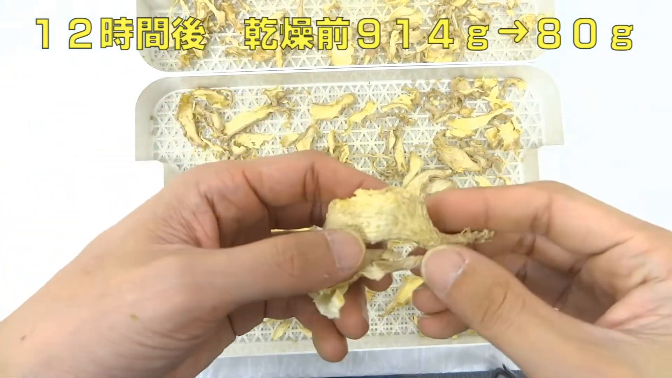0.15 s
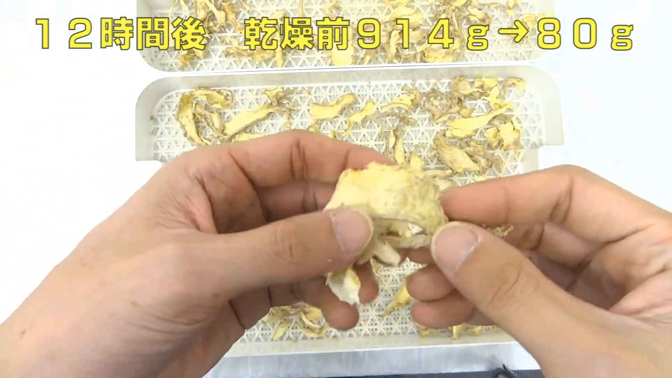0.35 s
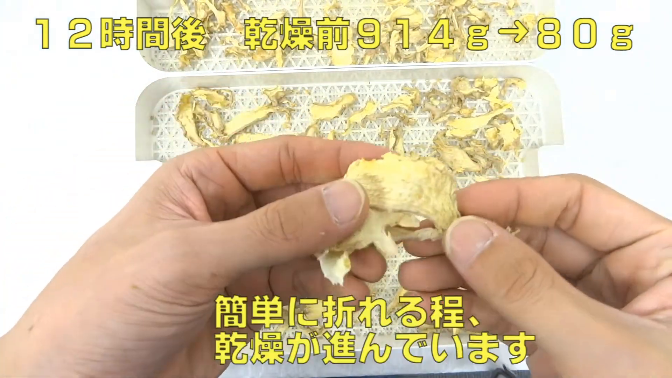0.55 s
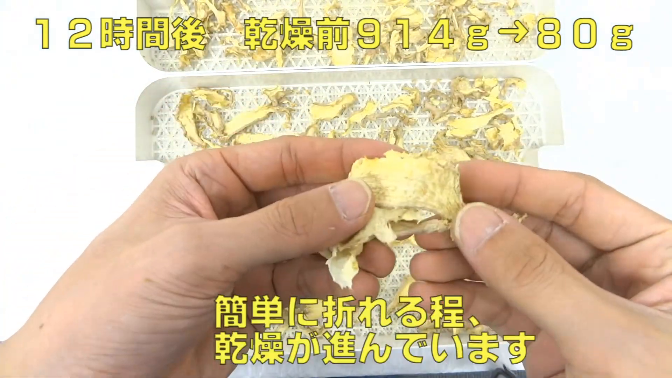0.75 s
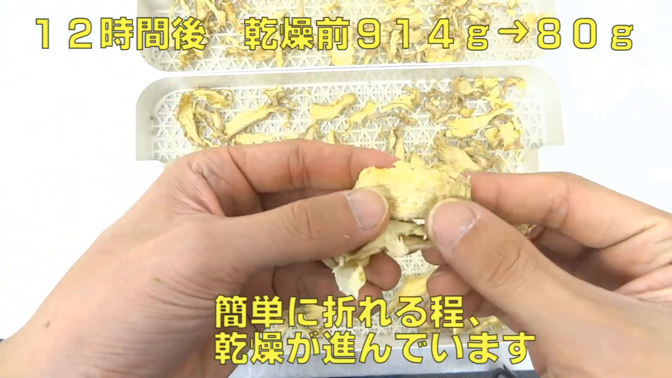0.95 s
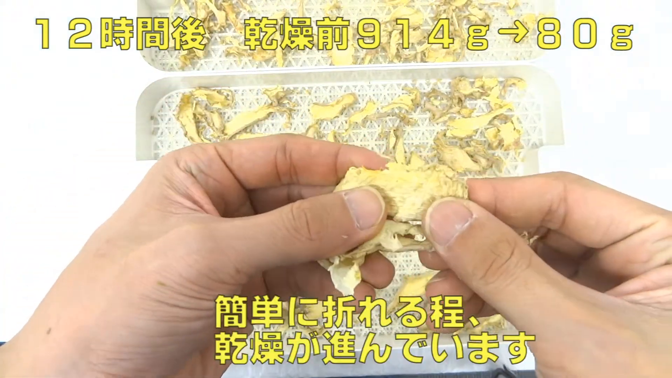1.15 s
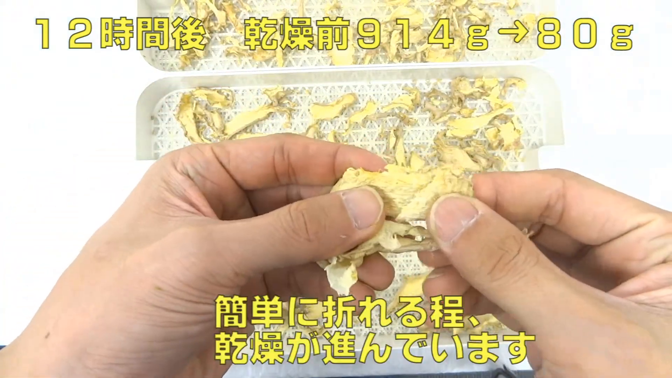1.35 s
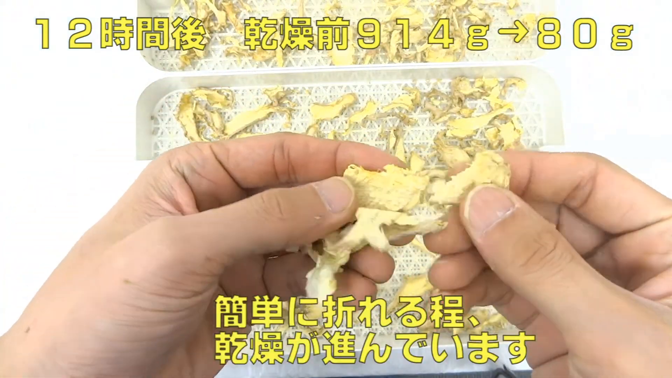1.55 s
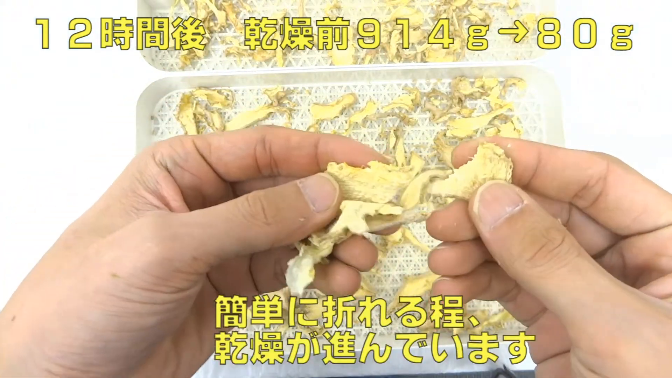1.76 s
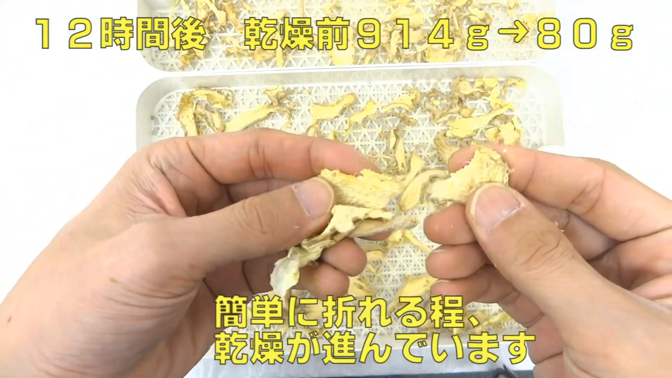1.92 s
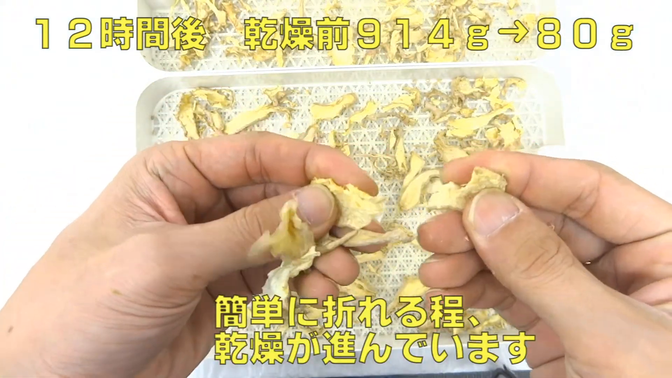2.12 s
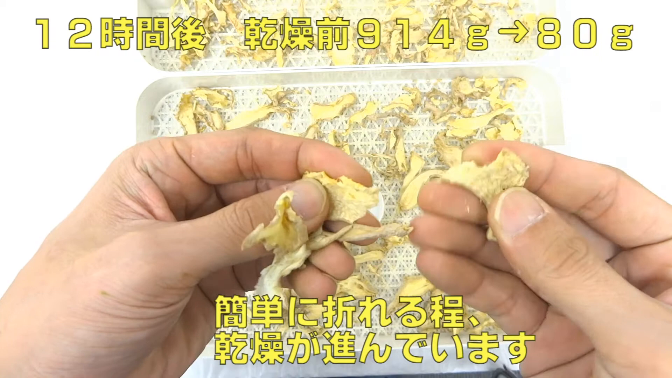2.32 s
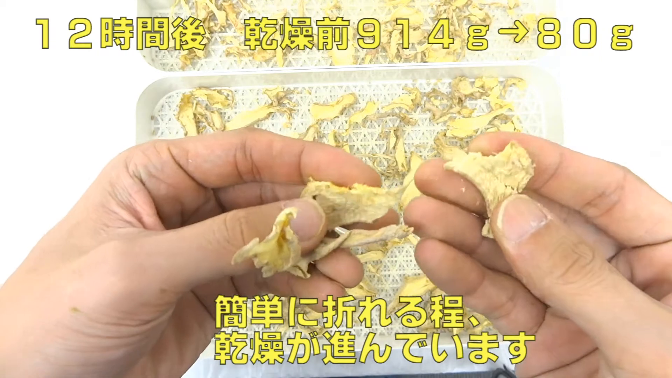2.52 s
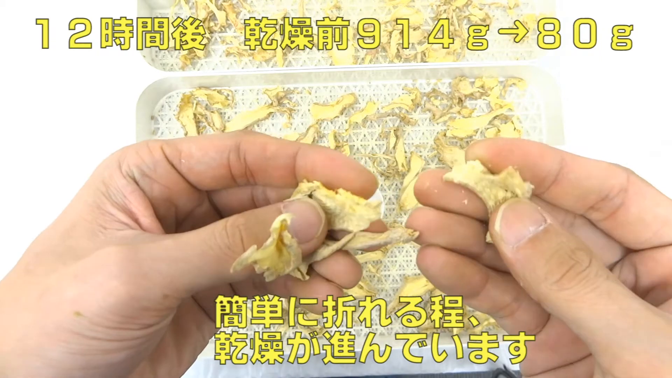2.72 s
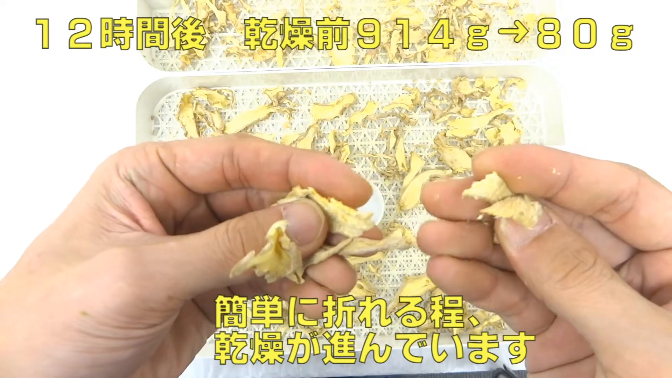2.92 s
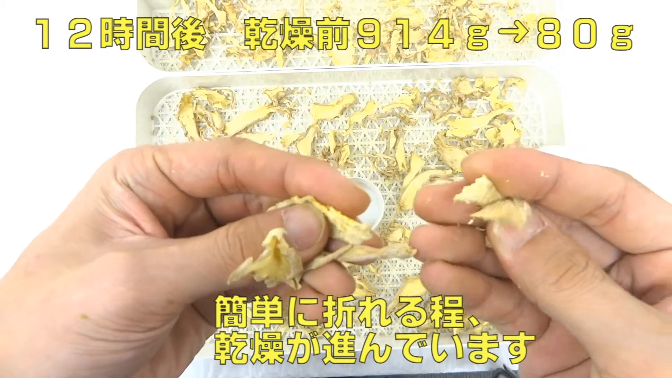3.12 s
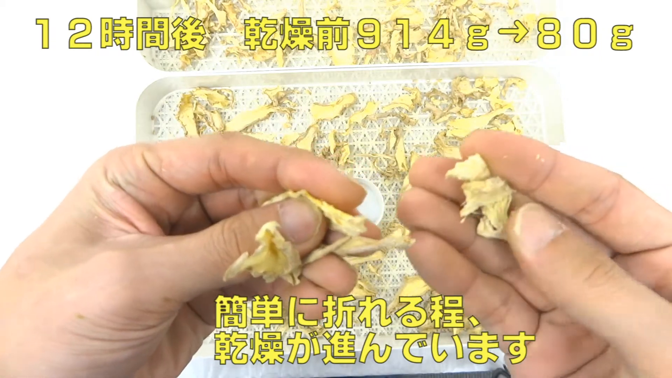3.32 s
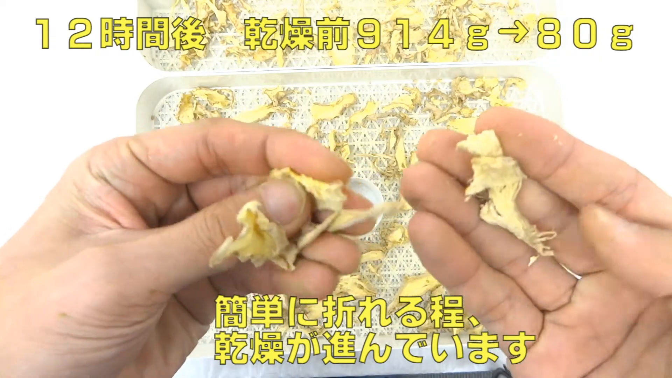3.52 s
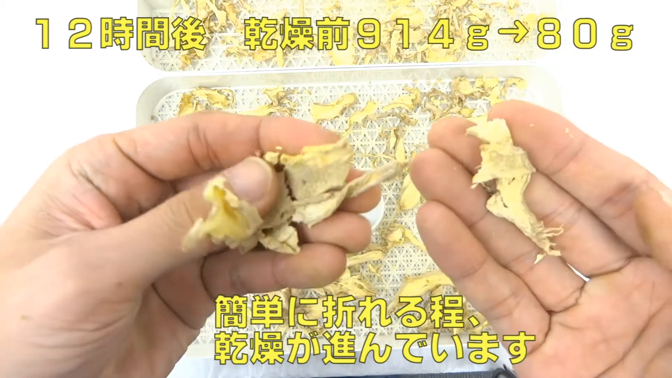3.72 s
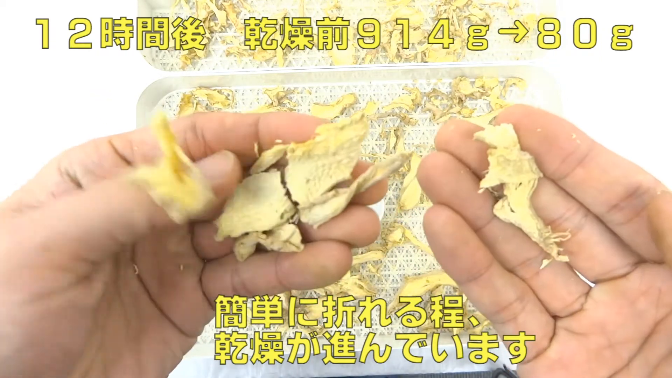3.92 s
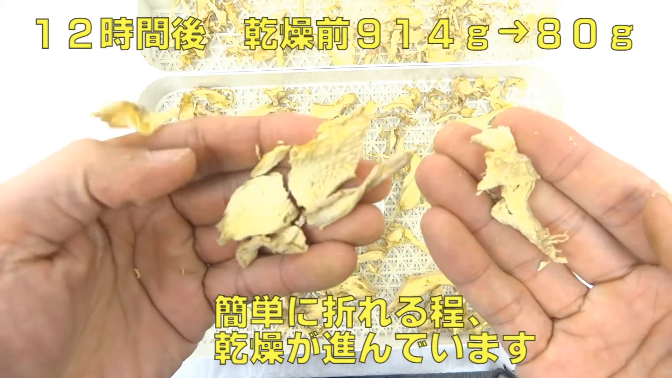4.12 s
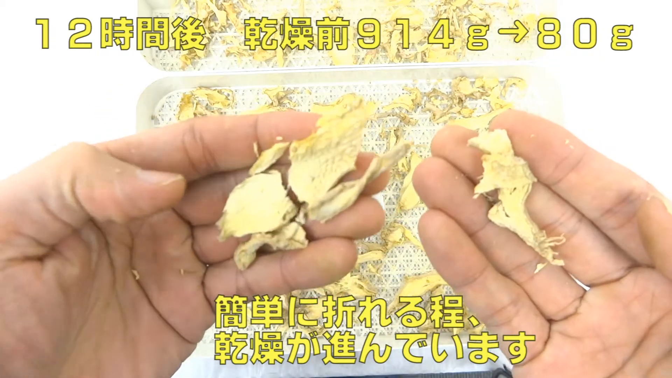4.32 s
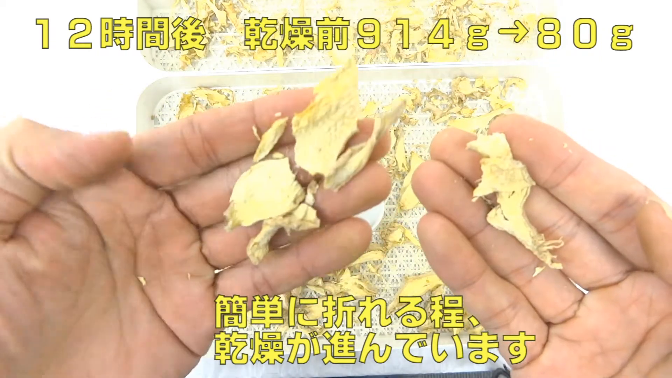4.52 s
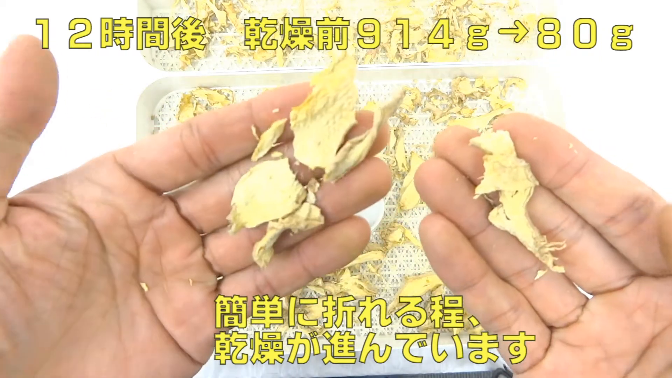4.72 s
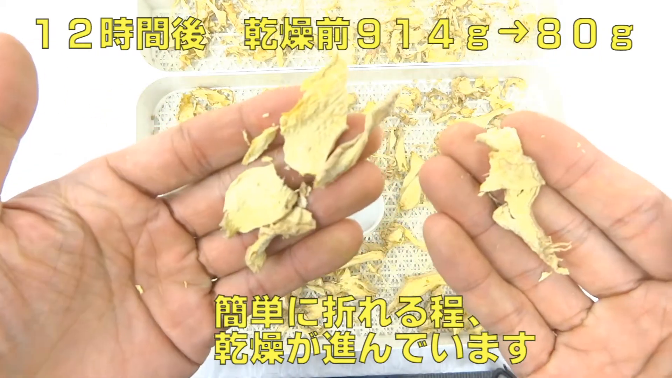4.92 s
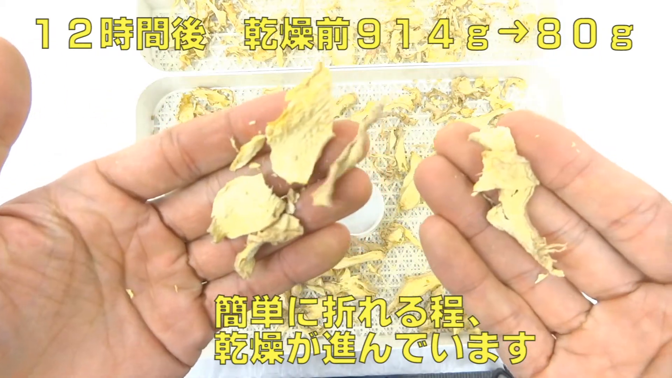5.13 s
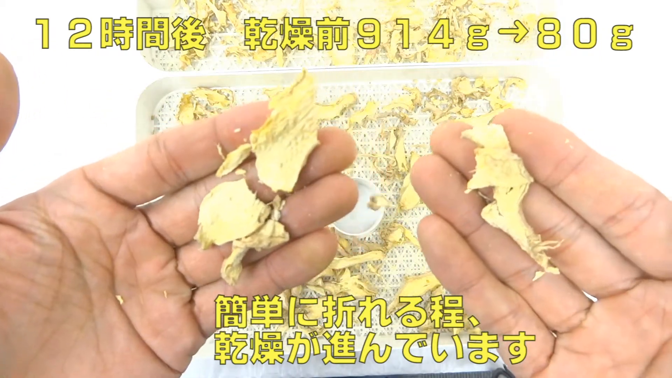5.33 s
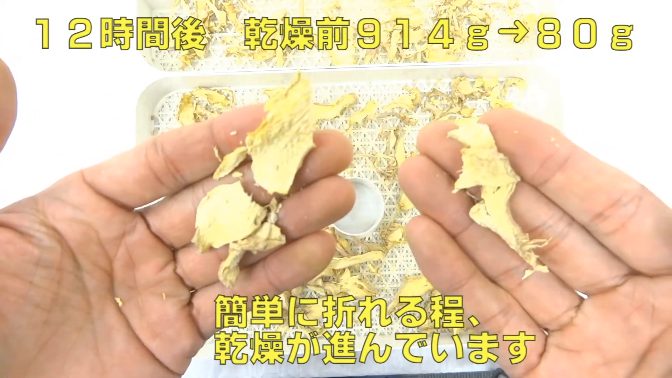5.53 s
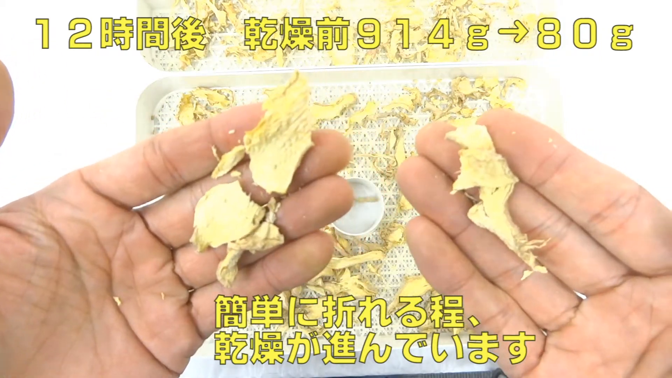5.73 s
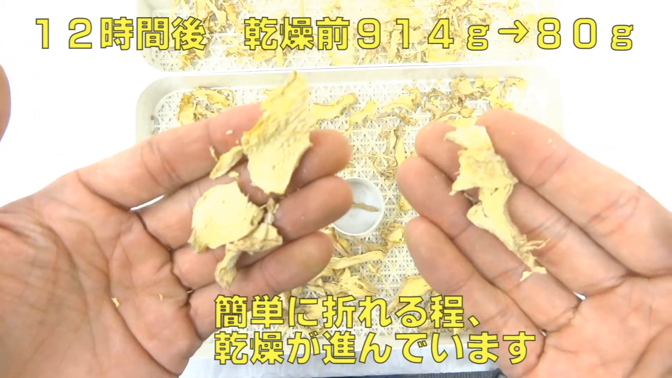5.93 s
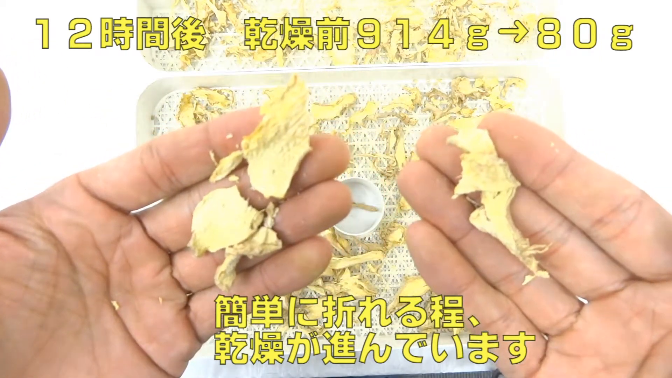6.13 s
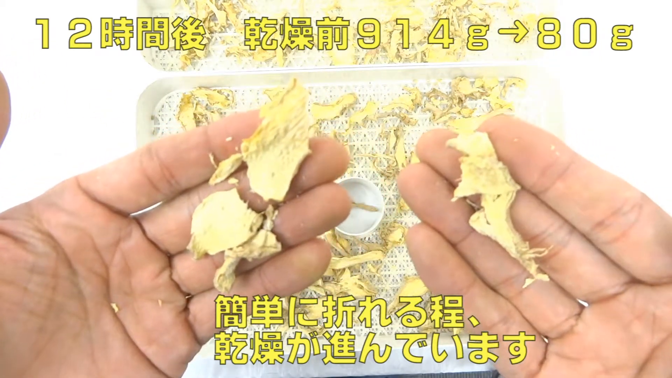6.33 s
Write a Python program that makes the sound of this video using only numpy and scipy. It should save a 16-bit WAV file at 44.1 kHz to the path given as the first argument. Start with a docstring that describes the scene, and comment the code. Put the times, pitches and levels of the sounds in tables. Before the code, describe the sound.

Close stereo sound in a small hard room, with a faint, steady low fan hum throughout. From 0 to 1 second, dry brittle slices crackle between fingers: rapid, crisp, high clicks over fine gritty crumbling. A dense, louder burst of snaps comes at about 1.1-1.2 seconds, then sparser ticks and faint thin scrapes until 1.7. Another sharp cluster runs from 1.8 to 2.1, with small woody rings, then lighter, duller ticks. The strongest single crack hits at 2.8, followed by bright snaps at 3.2 and 3.4 and lesser ones to 3.7, including a tiny falling squeak near 3.6. From 4 to 4.6 only weak, soft crackles remain. Soft hiss swells briefly around 5. At 5.53 a dropped piece clacks on a hollow plastic tray, rattling in quick bounces until 5.6, with a faint tap at 5.85. Quiet hum and faint hiss end it near 6.4.

```python
"""Fingers snap and crumble dry, brittle slices of root close to a stereo microphone, above a plastic tray.
Each crack is a click, mostly of a millisecond or two: shaped noise coloured by splinter and slice, over a thud.
Sparse grains make the crumbling; short modes colour the cracks; thin noise bands scrape, small tones squeak.
One piece bounces on the tray. Hands, tray and a small hard room throw the sounds back as taps and noisy tails.
A fan hums somewhere in the room, made of noise through resonances, under a soft hiss that swells and fades."""
import sys
import numpy as np
from scipy import signal
from scipy.fft import rfft, irfft
from scipy.io import wavfile
from scipy.ndimage import uniform_filter1d

SR = 44100
rng = np.random.default_rng(int(sys.argv[2]) if len(sys.argv) > 2 else 0)


def wav_record(signal):
    """Record a signal, one row per channel, as 16-bit PCM in the file named by sys.argv[1]."""
    frames = np.transpose(np.atleast_2d(signal))
    bounded = np.clip(frames, -1, 1)
    # unit amplitude maps onto the largest positive 16-bit level
    quanta = np.round(bounded * 32767).astype(np.int16)
    wavfile.write(sys.argv[1], SR, quanta)


N = 284886


def gain_of(db):
    """Decibels to gain."""
    return 10 ** (np.asarray(db) / 20)


def evened(x):
    """Scaled to rms 1."""
    return x / np.sqrt(np.mean(x ** 2) + 1e-20)


def read(points, hz):
    """Curve of (Hz, value) points, interpolated on a log-frequency axis."""
    point_hz, value = np.transpose(points)
    return np.interp(np.log(hz + 1), np.log(point_hz + 1), value)


def peaked(modes, hz):
    """Gain of steep resonant peaks standing on a flat response."""
    power = 1
    for mode_hz, width_hz, db in modes:
        power = power + (gain_of(db) ** 2 - 1) / (1 + (2 * (hz - mode_hz) / width_hz) ** 2) ** 2
    return np.sqrt(power)


def causal(gain):
    """Minimum-phase impulse response: starts sharply and has the given gain at each frequency."""
    log_gain = np.log(gain + 1e-4 * gain.max())
    circle = np.concatenate([log_gain, log_gain[-2:0:-1]])
    return np.fft.ifft(np.exp(np.conj(signal.hilbert(circle)))).real


def add(mix, start_s, sound):
    """Mixes a sound in at start_s."""
    part = mix[round(start_s * SR):][:len(sound)]
    part += sound[:len(part)]


def burst(noise, length_ms):
    """Noise that swells and dies within moments, its spectrum evened so that only the struck body colours it."""
    u = np.arange(len(noise)) * 3100 / SR / max(length_ms, .15)
    shape = u ** 2 * np.exp(-1.5 * u)
    z = rfft(noise * shape)
    white = irfft(z / (abs(z) + 1e-9), len(noise))
    return np.sqrt(shape) * white


# clear cracks: start_s, tear_peak_db, centre_hz, thud_db (re tear), length_ms, room_db (send past the hands)
CRACKS = [(.129, -25.5, 10200, -23, 6.9, -4), (0.1412, -25, 10000, -19, 2.7, 5.5),
          (0.2556, -20.5, 10500, -17, 0.91, 5.5), (0.2663, -26, 9500, -21, 0.83, -1),
          (.275, -24, 8400, -15, 1.1, 8.5), (0.2859, -17.5, 9700, -25, 0.74, 4.5),
          (0.308, -23, 9000, -24, 2.3, -11), (0.3199, -18.5, 6500, -27, 0.97, -13),
          (.3323, -22, 9400, -21, 1., -14), (.3557, -31, 5600, -15, 1.2, -1),
          (.388, -30, 9300, -40, 1.2, 1), (0.4009, -19.5, 9400, -35, 2.3, 3.5),
          (0.4316, -20, 8100, -15.5, 2.6, -3), (.4507, -24, 8900, -15, 1, -16),
          (.463, -21.5, 9100, -16, 0.8, -19), (0.5269, -27, 7740, -11, 2.3, -4),
          (0.5723, -26, 8500, -16, 1.4, -4), (0.599, -27.5, 8100, -9, 0.36, 9.5),
          (0.666, -22.5, 9800, -13.5, 3.9, -16), (.734, -27, 9500, -20, 2, -6),
          (.7385, -17, 9500, -22, 2.4, -8), (.7512, -31, 6250, -39, 2.1, -15),
          (0.783, -30, 5650, -11, 0.79, -19), (0.8163, -33, 9900, -9, 3.5, 4.5),
          (.83, -27, 10000, -15, 1, -8), (.897, -27.5, 9700, -20, 1, -3),
          (.917, -27.5, 10000, -43, 1.5, 4.5), (0.936, -32, 8900, -1.5, 1.7, 2),
          (0.9496, -24, 10700, -13, 1.8, 1.5), (1.041, -29, 10100, -19, 1.6, 0),
          (1.079, -31, 8040, -13, 1.4, -25), (1.098, -25, 10000, -31, 1, -16),
          (1.1084, -13.5, 7200, -20, 1.3, -36), (1.1316, -13, 7700, -17.5, 0.42, -7),
          (1.14, -18, 9250, -28, 1.8, -7), (1.1483, -13, 8700, -29, 0.94, 0.5),
          (1.1525, -8, 10000, -45, 0.87, -21), (1.164, -15.5, 9700, -32, 1.9, -4),
          (1.168, -19, 5500, -18, 1.5, -4), (1.1794, -9.5, 9600, -27, 0.39, -8.5),
          (1.241, -26, 8300, -15, 1.2, -10), (1.2573, -18.5, 9000, -13, 1.02, -13),
          (1.3684, -20.5, 10900, -14, 0.47, -9), (1.4071, -33, 9000, -6.5, 1.07, 8),
          (1.462, -27, 9900, -13, 4, -1), (1.5685, -19, 9900, -12, 0.73, -3),
          (1.639, -31.5, 9130, -33, 1.9, -15.5), (1.7311, -29, 10200, -20, 1.7, -3),
          (1.747, -34, 8450, -18, 0.97, -7), (1.771, -21.5, 8700, -21, 0.85, -6),
          (1.811, -24, 10200, -23, 2.1, -5), (1.8246, -13, 9400, -12, 0.82, -10),
          (1.828, -14, 9800, -39, 1.4, -19), (1.8446, -19, 9200, -31, 1, -17),
          (1.868, -25, 9500, -15, 2, -24), (1.9165, -16, 10000, -15, 2.2, -6),
          (1.929, -13.5, 9300, -35, 1.9, -16), (1.9436, -11.5, 10300, -35, 1.6, -14),
          (1.958, -25, 9500, -23, 1.8, -8), (1.971, -10.5, 10850, -45, 0.5, 6),
          (1.9767, -8.5, 11100, -25.5, 0.22, -3.5), (1.9808, -10.5, 9000, -16.5, 1.6, -5.5),
          (2.049, -31.5, 7800, -6, 1.9, -11), (2.0847, -20, 8370, -23, 2.2, -11),
          (2.0938, -15.5, 6900, -25, 3.5, -5), (2.1044, -12, 8240, -22, 1.6, -3),
          (2.177, -17, 8300, -25, 0.45, -18), (2.2127, -40, 5400, -7, 1, 8),
          (2.274, -35.5, 6200, -5.5, 1.6, -4), (2.3933, -30.5, 8980, -8.5, 1.5, 0),
          (2.472, -25, 7170, -37, 0.41, -8.5), (2.5122, -31, 7380, -5.5, 2.6, -18),
          (2.5206, -29.5, 7250, 1.5, 2.2, -5), (2.5337, -29, 9100, -21, 1.7, -2.5),
          (2.6385, -30.5, 9730, -28.5, 1.6, -4.5), (2.794, -21, 8700, -24.5, 0.5, -1.5),
          (2.8177, -4, 10000, -18.5, 0.81, -6), (2.86, -16.5, 9200, -33.5, 0.85, 0.5),
          (2.9322, -25.5, 8700, -22, 0.41, -4), (2.9626, -16.5, 8900, -40, 0.61, -11.5),
          (2.975, -26, 9300, -30.5, 0.56, -1), (2.997, -26.5, 8860, -28, 1.04, -18),
          (3.0253, -24.5, 9100, -31, 0.49, -7), (3.0373, -18.5, 7600, -30, 0.77, -12),
          (3.051, -38.5, 8100, -0.5, 1.5, 2), (3.091, -30.5, 9100, -30.5, 0.97, -8),
          (3.122, -23.5, 5300, -33, 0.78, -9), (3.2403, -9, 7160, -37.5, 1.14, -3),
          (3.284, -32, 5750, -37, 1, -6), (3.3205, -24.5, 10100, -27, 1.3, -10),
          (3.343, -24, 8680, -33, 0.81, -13), (3.352, -28.5, 9550, -38, 3.7, -7),
          (3.3674, -7.5, 8750, -35, 0.39, -9), (3.376, -20, 9100, -40, 1.9, 3.5),
          (3.3885, -18, 9300, -50, 1.8, 1), (3.470, -14, 7840, -43, 3.4, -3),
          (3.562, -24.5, 8500, -38, 8.8, -6), (3.5673, -25, 8700, -39, 2.4, -7),
          (3.6452, -22, 9900, -21, 3.5, 1), (3.6726, -31.5, 8000, -21, 6, -15),
          (4.045, -36, 8200, -4.5, 7.3, -9), (4.071, -34.5, 7500, -6, 5.7, -10),
          (4.1266, -42, 7400, -15, 4.9, -9), (4.305, -44, 8500, -14, 2.8, -6),
          (4.382, -33.5, 8400, -28, 1.4, -9), (4.461, -28, 9250, -10, 8.2, -9),
          (4.4717, -23, 9400, -5.5, 1.04, -2.5), (4.5262, -36.5, 9500, -18, 5.5, -8),
          (4.57, -37.5, 7900, -15, 1.3, 0.5)]
# rings of a dry slice: mode_hz, width_hz, peak_db
SLICE_MODES = [(4650, 810, 4.5), (6500, 1100, -0.5), (8700, 470, -3.5), (10370, 2500, 5)]
SPREAD_AT_11300HZ_HZ, SPREAD_PER_OCTAVE_HZ = 3640, 1700  # lower cracks are wider in colour
UNEVEN_DB = 3  # rms of each crack's own bumps in colour


def cracks():
    """Each crack is a short tear of fibres, coloured by the splinter's size and the slice's rings, over a low thud."""
    near, far = np.zeros((2, N))
    hz = np.fft.rfftfreq(1024, 1 / SR)
    thud = 1 / (1 + (hz / 4400) ** 4) / (1 + (1200 / (hz + 1)) ** 3)
    slice_gain = peaked(SLICE_MODES, hz) / (1 + (4150 / (hz + 1)) ** 15)
    bumps = rng.standard_normal((len(CRACKS), len(hz)))
    bumps = evened(uniform_filter1d(uniform_filter1d(bumps, size=12), size=12))
    fibre_noise = rng.standard_normal((len(CRACKS), 600))
    for row, fibres, bump in zip(CRACKS, fibre_noise, bumps):
        start_s, peak_db, centre_hz, thud_db, length_ms, room_db = row
        spread_hz = SPREAD_AT_11300HZ_HZ + SPREAD_PER_OCTAVE_HZ * np.log2(11300.0 / centre_hz)
        uneven = gain_of(UNEVEN_DB * bump)
        colour = np.exp(-((hz - centre_hz) / spread_hz) ** 2) * slice_gain * uneven
        force = burst(fibres, length_ms)
        tear = np.convolve(causal(colour)[:512], force)
        push = np.convolve(causal(thud * uneven)[:512], force)
        snap = tear / abs(tear).max() + gain_of(thud_db) * push / abs(push).max()
        snap = gain_of(peak_db) * snap
        add(near, start_s, snap)
        add(far, start_s, gain_of(room_db) * snap)
    return near, far


# short rings that colour the cracks: start_s, pitch_hz, peak_db, room_db (send)
RINGS = [(.274, 6760, -30, -15), (.3095, 5100, -22, -16), (0.3106, 9860, -18, -3.5), (0.317, 5020, -28, -3),
         (.3185, 6400, -23, -7), (0.318, 3000, -34, -9), (.356, 5060, -29, -13), (.432, 6550, -23.5, -18),
         (.527, 3800, -35, -10), (.611, 6800, -32, -5), (.651, 4700, -34, -8), (.739, 4300, -28, -10),
         (.753, 5840, -26, -8), (.785, 5120, -28.5, -9.5), (.855, 7000, -41, -12), (1.039, 9000, -30, -4),
         (1.153, 1900, -27, -12), (1.179, 3700, -24, -8), (1.184, 4600, -25, -6), (1.461, 5300, -39, -2),
         (1.763, 5000, -47, -8), (1.798, 6000, -39, -3), (1.844, 4600, -32.5, -8), (1.9435, 6000, -24, -10),
         (1.9435, 4000, -27, -10), (1.958, 4600, -24, -10), (1.981, 3500, -24, -6), (2.085, 3700, -28, -4),
         (2.0955, 9000, -20, -6), (2.102, 7600, -22, -12), (2.104, 10100, -14, -10),
         (2.095, 6000, -16, -16), (2.104, 4650, -27.5, 10.5), (2.104, 2050, -27.5, 1.5),
         (2.52, 6750, -27.5, -19), (3.123, 3740, -36.5, -11), (3.282, 3600, -44, -10),
         (3.47, 10900, -18, -14), (3.472, 2740, -40, -10), (3.283, 5300, -24.5, -8),
         (3.388, 5000, -23.5, -4), (3.471, 4650, -22.5, -5), (3.472, 3670, -26.5, -7)]


def rings(t60_s=0.01, tear_ms=1.03):
    """Each ring is one quickly dying mode, shaken by a gritty tear."""
    near, far = np.zeros((2, N))
    t = np.arange(2000) / SR
    grits = rng.standard_normal((len(RINGS), 400))
    for (start_s, pitch_hz, peak_db, room_db), grit in zip(RINGS, grits):
        mode = gain_of(-60 * t / t60_s) * np.sin(2 * np.pi * pitch_hz * t)
        ring = np.convolve(mode, burst(grit, tear_ms))
        ring = gain_of(peak_db) * ring / abs(ring).max()
        add(near, start_s, ring)
        add(far, start_s, gain_of(room_db) * ring)
    return near, far


# faint fidgeting of the fingers: time_s, level_db, coarseness_db_per_octave (towards the bass)
FIDGET = [(0., -44, -3), (.9, -58, 5.5), (1.04, -71, 11.5), (1.9, -47.5, -20), (2.5, -68.5, -17),
          (3.15, -69, 13), (3.45, -52, 0.5), (3.8, -59.5, 1.5), (4.1, -66, 8), (4.6, -78.5, 10.5),
          (4.96, -68, 1.5), (5.4, -72, 2), (6.46, -82.5, 15.5)]
# rubs that crumble the edges: middle_s, half_span_s, level_db, coarseness_db_per_octave
RUBS = [(.03, 0.15, -43.5, -5), (.16, 0.11, -48, 3.5), (.31, 0.19, -56, 0.5), (.44, 0.099, -46, 6.5),
        (0.642, 0.14, -40.5, -3.5), (0.768, 0.17, -47, -0.5), (0.948, 0.18, -47, -2),
        (1.17, 0.12, -38.5, 4.5), (1.442, 0.18, -46.5, 4), (1.598, 0.14, -45.5, 2), (1.8, 0.17, -45, 3.5),
        (2.01, 0.14, -42, 5), (2.148, 0.089, -39.5, 4.5), (2.332, 0.14, -47, -2.5),
        (2.478, 0.13, -48.5, -2.5), (2.722, 0.12, -48.5, -2), (2.88, 0.13, -45, 0), (3.32, 0.12, -42.5, -3),
        (3.53, 0.28, -49, 0.5), (3.68, 0.065, -50.5, -10), (3.852, 0.082, -60, 6.5), (4.4, 0.12, -63, 9),
        (4.76, 0.11, -56, -3.5)]


def handling():
    """Level and coarseness of the crumbling: each rub swells and fades as a bell over the fidgeting."""
    t = np.arange(0, N / SR, .002)
    time_s, level_db, slope = np.transpose(FIDGET)
    power = gain_of(np.interp(t, time_s, level_db)) ** 2
    weighted = power * np.interp(t, time_s, slope)  # coarseness averages by power
    for middle_s, half_span_s, rub_db, rub_slope in RUBS:
        phase = np.clip((t - middle_s) / (2 * half_span_s), -.5, .5)
        swell = gain_of(rub_db) ** 2 * np.cos(np.pi * phase) ** 4
        power = power + swell
        weighted = weighted + swell * rub_slope
    at = np.arange(N) / SR
    return np.interp(at, t, np.sqrt(power)), np.interp(at, t, weighted / power)


# colour of the crumbs: pitch_hz, level_db
CRUMB_COLOUR = [(2000, -12.5), (3500, -8), (4700, -3.5), (6500, -7.5), (8000, -3.5), (10500, 3.5)]
CRUMBS_PER_S, CRUMB_SPREAD_DB = 3000, 6


def crumble(cycles=5.5):
    """Sparse tiny grains of many pitches and uneven size; coarse crumbs favour the low ones."""
    level, coarse = handling()
    pitches_hz = np.geomspace(2000, 11000, num=18)
    size = gain_of(CRUMB_SPREAD_DB * np.minimum(rng.exponential(1, N), 3.))
    size *= rng.random(N) < CRUMBS_PER_S / SR
    size *= rng.choice([-1, 1], N)
    kind = rng.integers(0, len(pitches_hz), N)
    out = np.zeros(N)
    for k, hz in enumerate(pitches_hz):
        u = np.arange(200) * hz / SR / cycles
        grain = u * np.exp(-2 * u) * np.sin(2 * np.pi * cycles * u)
        colour_db = read(CRUMB_COLOUR, hz) + coarse * np.log2(10000 / hz)
        gain = gain_of(colour_db) * np.sqrt(hz) / np.linalg.norm(grain)
        out += signal.oaconvolve(size * (kind == k) * gain, grain)[:N]
    return level * evened(out)


# scrapes of one edge on another: start_s, length_s, centre_hz, width_hz, level_db
SCRAPES = [(0.409, 0.053, 6500, 400, -42), (0.806, 0.044, 9900, 500, -43), (1.469, 0.025, 10200, 400, -46),
           (1.548, .035, 7270, 250, -47), (1.57, 0.023, 5660, 200, -55), (1.572, 0.031, 10300, 600, -41),
           (1.611, 0.038, 5760, 150, -52), (1.602, 0.049, 9800, 500, -44)]


def scrapes():
    """Each thin whistling scrape is a narrow band of noise that swells and fades."""
    out = np.zeros(N)
    noises = rng.standard_normal((len(SCRAPES), 4000))
    hz = np.fft.rfftfreq(4000, 1 / SR)
    t = np.arange(4000) / SR
    for (start_s, length_s, centre_hz, width_hz, level_db), noise in zip(SCRAPES, noises):
        band = irfft(rfft(noise) / (1 + (2 * (hz - centre_hz) / width_hz) ** 2))
        swell = np.sin(np.pi * np.clip(t / length_s, 0, 1))
        add(out, start_s, gain_of(level_db) * swell * evened(band))
    return out


# a falling squeak and a faint steady peep, one table each: time_s, pitch_hz, level_db
SQUEAKS = [
    [(3.587, 1910, -48), (3.596, 1620, -47), (3.608, 1520, -52)],
    [(6.405, 3010, -58), (6.455, 3010, -60)],
]


def squeaks():
    """Brief sine tones with soft ends, following their pitch and level curves."""
    out = np.zeros(N)
    for rows in SQUEAKS:
        time_s, pitch_hz, level_db = np.transpose(rows)
        t = np.arange(time_s[0], time_s[-1], 1 / SR)
        cycles = np.cumsum(np.interp(t, time_s, pitch_hz)) / SR
        tone = np.sin(2 * np.pi * cycles) * signal.windows.tukey(len(t))
        add(out, time_s[0], gain_of(np.interp(t, time_s, level_db)) * tone)
    return out


# bounces of the dropped piece: start_s, peak_db, length_ms, sharpness_db_per_octave, strong_hz,
# tray_freedom (0-1), room_db (send)
BOUNCES = [(5.5318, -19.5, 4.8, 3.5, 9000, .9, -5), (5.5351, -12.5, 4.9, 3.5, 4600, 1, -4.5),
           (5.5416, -20.5, 6.2, -0.5, 2150, 0.9, -2.5), (5.573, -22, 3, 5, 9500, .3, -4),
           (5.5745, -26.5, 4, 6, 4800, .2, -1.5), (5.598, -28, 5.3, 5.5, 9500, 0.2, -6),
           (5.601, -18, 6, 3, 3200, 0.05, -10), (5.848, -38, 4.5, 3, 2650, .4, 1.5)]
# tray resonances: mode_hz, width_hz, peak_db
TRAY_MODES = [(298, 160, 3.5), (640, 170, 14.5), (1490, 230, 10.5), (2342, 40, 15), (3480, 200, 1),
              (4500, 200, 5), (9000, 600, 9)]
# knock spectrum: freq_hz, density_db (per Hz, relative)
KNOCK = [(80, -50), (200, 2.5), (600, 1), (2300, 4), (3500, -1.5), (11000, -12.5)]


def bounces():
    """Each bounce is a short rattle that rings the tray."""
    near, far = np.zeros((2, N))
    hz = np.fft.rfftfreq(8192, 1 / SR)
    tray = peaked(TRAY_MODES, hz)
    rattles = rng.standard_normal((len(BOUNCES), 1000))
    for row, rattle in zip(BOUNCES, rattles):
        start_s, peak_db, length_ms, sharpness, strong_hz, freedom, room_db = row
        colour = gain_of(read(KNOCK, hz) + sharpness * np.log2((hz + 100) / 3000))
        colour = colour * peaked([(strong_hz, 0.35 * strong_hz, 7.)], hz)
        body = causal(colour * tray ** freedom)[:4096]
        blow = np.convolve(body, burst(rattle, length_ms))
        blow = gain_of(peak_db) * blow / abs(blow).max()
        add(near, start_s, blow)
        add(far, start_s, gain_of(room_db) * blow)
    return near, far


# reflections from hands and tray: delay_ms, level_db
ECHOES = [(1.1, -12), (2.3, -10), (3.4, -16.5)]
# reflections from table and near walls: delay_ms, level_db
LATE_ECHOES = [(4.5, -6), (8.6, -14), (20., -17.5)]


def echoes(x, taps, lean_db=.5):
    """Single reflections of alternating sign, leaning left and right in turn."""
    out = np.zeros((2, N))
    for k, (delay_ms, level_db) in enumerate(taps):
        sign = (-1) ** k
        add(out[0], delay_ms / 1000, sign * gain_of(level_db + sign * lean_db) * x)
        add(out[1], delay_ms / 1000, sign * gain_of(level_db - sign * lean_db) * x)
    return out


def scattered(x, length_ms=2.4):
    """Blurred by uneven surfaces over a few milliseconds."""
    blur = burst(rng.standard_normal(1000), length_ms)
    return signal.oaconvolve(x, blur / np.linalg.norm(blur))[:N]


# decay of the room: freq_hz, t60_s
ROOM_DECAY = [(500, 0.77), (1500, 0.44), (4500, 0.32), (7000, 0.32), (11000, 0.2)]


def room(x, wide_db=-12.5, rise_ms=2.5, turns_per_s=9.):
    """Sparse taps, each band dying at its own speed; three random tails take turns at a steady rate,
    so the room's colour varies."""
    size, out = SR // 2, np.zeros((2, N))
    slots = np.arange(200, size - 10, 10)
    rise = 1 - np.exp(-np.arange(size) / SR * 1000 / rise_ms)
    for k in range(3):
        taps = np.zeros((2, size))
        at = slots + rng.integers(0, 10, (2, len(slots)))
        np.put_along_axis(taps, at, rng.choice([-1., 1.], (2, len(slots))), 1)
        hz, t, z = signal.stft(taps * rise, SR, nperseg=256)
        decay = gain_of(-60 * t / read(ROOM_DECAY, hz)[:, None])
        tail = signal.istft(z * decay, SR, nperseg=256)[1]
        # the three shares' powers sum to 1
        share = np.sqrt(2 / 3) * np.cos(np.pi * (turns_per_s * np.arange(N) / SR + k / 3))
        out += signal.fftconvolve(share * x[None], tail / np.linalg.norm(tail[0]), axes=1)[:, :N]
    mid, side = out
    side = gain_of(wide_db) * side
    return np.array([mid + side, mid - side])


# air noise spectrum: freq_hz, density_db (per Hz, relative)
AIR = [(25, -38), (50, -17.5), (105, -22.5), (180, -12.5), (270, -10.5), (450, -10), (750, -14.5),
       (1100, -15.5), (1400, -18), (2500, -16.5), (3100, -27.5), (5300, -29.5), (6200, -33), (11000, -40.5)]
# resonances in the hum: mode_hz, width_hz, peak_db (over the air noise)
HUM_MODES = [(88.13, 4.9, 17), (125.95, 8.1, 16), (165, 21, 2), (241.26, 11.3, 16.5), (306.6, 24.6, 10.5),
             (400, 12, -0.5), (510, 17.2, 11), (1092, 250, 5.5), (1101, 20, 13), (1675, 89, 6),
             (2360, 18, 8), (2714, 42, 7.5)]
# stereo likeness of the hum: freq_hz, likeness (1 = same left and right)
LIKENESS = [(60, 0.94), (170, 1), (490, 0.86), (1410, 0.69), (4060, 0.54), (11600, 0.48)]
HUM_RMS_DB = -49


def hum(patchy_db=1.46, swell_db=-0.87):
    """Air noise through the fan's resonances, with drifting patches and a slow swell."""
    frames, hz = N // 1024 + 5, np.fft.rfftfreq(4096, 1 / SR)
    a, b, c, d, patches = rng.standard_normal((frames, len(hz), 5)).T
    patches = uniform_filter1d(patches, size=20, axis=0)  # across frequency
    patches = evened(uniform_filter1d(patches, size=10, axis=1))  # across time
    swell = evened(uniform_filter1d(rng.standard_normal(frames), size=8))
    likeness = np.clip(read(LIKENESS, hz), 0, 1)
    apart = np.sqrt((1 - likeness) / 2)[:, None] * (c + 1j * d)
    z = np.array([a + 1j * b + apart, a + 1j * b - apart])
    z *= gain_of(read(AIR, hz)[:, None] + patchy_db * patches + swell_db * swell)
    z *= peaked(HUM_MODES, hz)[:, None]
    noise = signal.istft(z, nperseg=4096, noverlap=3072)[1][:, :N]
    return gain_of(HUM_RMS_DB) * evened(noise)


# soft hiss above the hum: time_s, level_db
HISS = [(3.7, -69), (4.6, -64), (4.94, -75), (5., -56), (5.15, -61), (5.22, -76), (5.78, -68), (5.86, -61),
        (5.95, -73), (6.15, -94), (6.4, -60)]
# edges of the hiss band: low_hz, high_hz
HISS_BAND = (2886, 5300)


def hiss(apart=0.68):
    """Smooth noise in one broad band, mostly alike in both channels, that swells and fades."""
    band = signal.butter(3, HISS_BAND, "band", fs=SR, output="sos")
    mid, side = signal.sosfilt(band, rng.standard_normal((2, N)))
    time_s, level_db = np.transpose(HISS)
    level = gain_of(np.interp(np.arange(N) / SR, time_s, level_db))
    return level * evened(np.array([mid + apart * side, mid - apart * side]))


def scene():
    """Close sounds with their echoes, the room's tail, and the background of hum and hiss."""
    snaps, far_snaps = cracks()
    ringing, far_ringing = rings()
    crumbs = crumble()
    piece, far_piece = bounces()
    near = snaps + crumbs + piece + ringing + squeaks() + scrapes()
    far = far_snaps + gain_of(-4.5) * crumbs + far_piece + far_ringing
    close = near + echoes(near, ECHOES) + echoes(scattered(far), LATE_ECHOES)
    balance = gain_of([[.05], [-.05]])  # left, right
    return close * balance + room(far) + hum() + hiss()


ROLL_OFF_HZ, EDGE_HZ = 11110, 12236


def record(dry):
    """The treble falls away in a sharp step, then ends."""
    hz = np.fft.rfftfreq(N, 1 / SR)
    shelf = gain_of(-25 - 17 * np.maximum(hz - ROLL_OFF_HZ, 0) / 1000)  # sinks 17 dB per kHz past the step
    drop = 1 / (1 + np.exp(np.clip((hz - ROLL_OFF_HZ) / 25, -50, 50)))
    stepped = irfft(rfft(dry) * (shelf + drop), N)
    low_pass = signal.firwin(255, EDGE_HZ, window=("kaiser", 9), fs=SR)
    return signal.oaconvolve(stepped, low_pass[None], "same")


dry = scene()
out = record(dry)
wav_record(out)
```